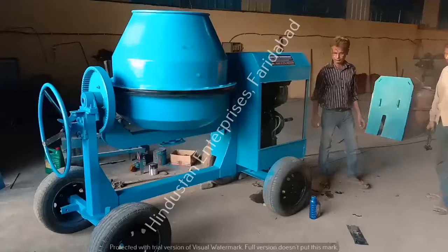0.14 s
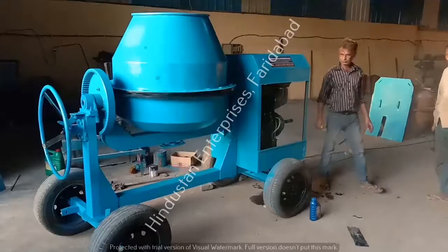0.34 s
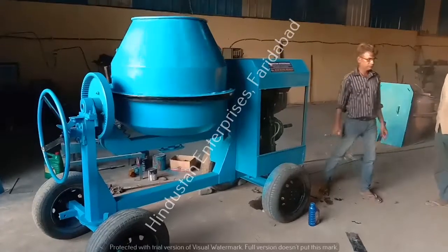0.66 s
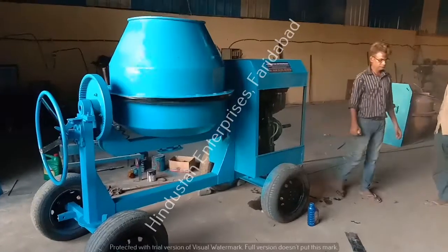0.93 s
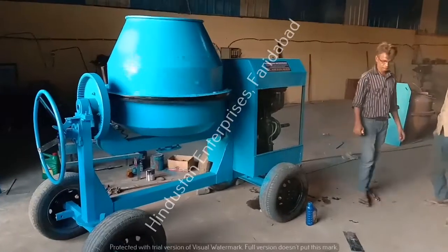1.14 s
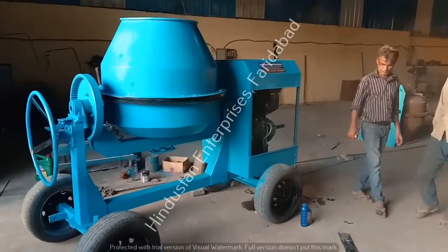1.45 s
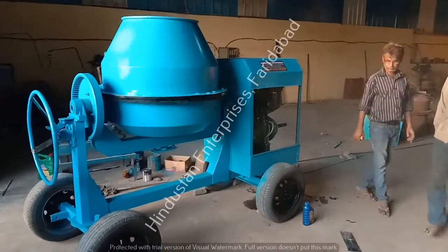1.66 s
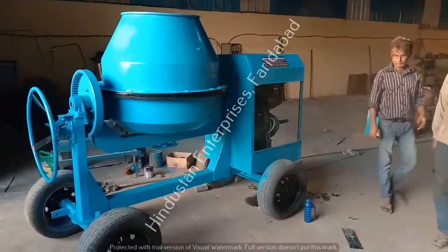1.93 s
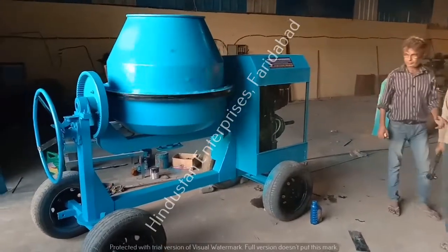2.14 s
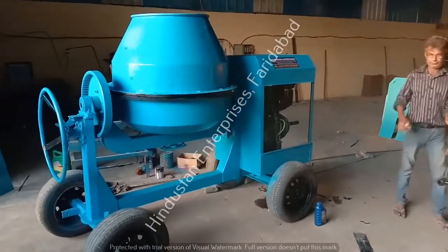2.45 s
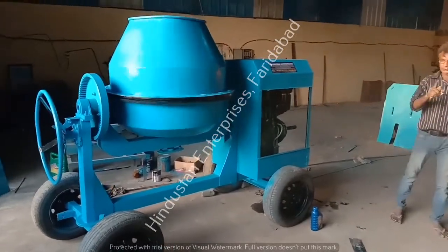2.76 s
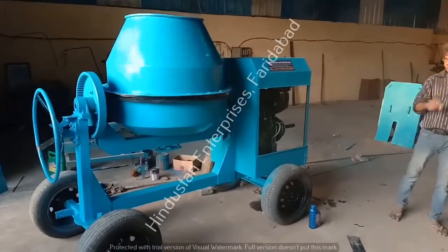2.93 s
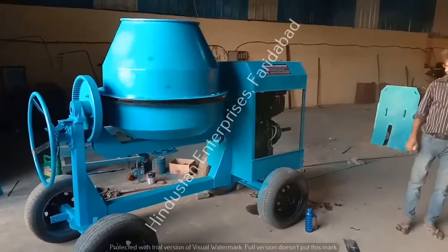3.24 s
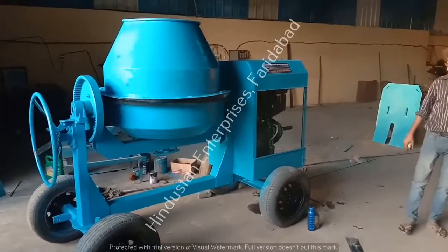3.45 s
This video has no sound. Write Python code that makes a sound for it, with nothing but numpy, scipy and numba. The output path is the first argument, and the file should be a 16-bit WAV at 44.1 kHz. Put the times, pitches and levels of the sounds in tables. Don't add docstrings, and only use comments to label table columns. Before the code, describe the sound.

Concrete mixer roar with fast diesel thumping, grinding gears and metallic drum rattle in a large shed.

```python
import sys
import numpy as np
from scipy import signal
from scipy.io import wavfile
from scipy.ndimage import uniform_filter1d
from numba import njit

SR = 44100
rng = np.random.default_rng(int(sys.argv[2]) if len(sys.argv) > 2 else 0)


def dump(signal):
    limited = np.clip(np.atleast_2d(signal).T, -1, 1)
    pcm = np.round(limited * 32767).astype(np.int16)
    wavfile.write(sys.argv[1], SR, pcm)


def gain_from_db(level_db):
    decades = np.asarray(level_db, float) / 20
    return 10 ** decades


N = 158319
START_S = 0.14


def level(x, db):
    return x * gain_from_db(db) / np.sqrt(np.mean(x ** 2))


def track(points):
    at_s, value = np.array(points).T
    return np.interp(np.arange(N) / SR, at_s, value)


@njit
def svf(x, hz, width):
    y = np.empty(len(x))
    band, low = 0., 0.
    g, k = np.tan(np.pi * hz / SR), width / hz
    for i in range(len(x)):
        v = (band + g * (x[i] - low)) / (1 + g * (g + k))
        band = 2 * v - band
        low += 2 * g * v
        y[i] = k * v
    return y


def svf_twice(x, hz, width):
    return svf(svf(x, hz, width), hz, width)


@njit
def walls(x, lags, gain, damp):
    line, soft, out = np.zeros((8, 8192)), np.zeros(8), np.zeros(len(x))
    for i in range(len(x)):
        total = 0.
        for k in range(8):
            soft[k] += (1 - damp) * (gain[k] * line[k, (i - lags[k]) & 8191] - soft[k])
            total += soft[k]
        out[i] = soft[0] - soft[3] + soft[4] - soft[7]
        for k in range(8):
            line[k, i & 8191] = x[i] + soft[k] - total / 4
    return out


def walk(rate_hz):
    hold = int(SR / rate_hz)
    steps = np.repeat(rng.standard_normal(N // hold + 1), hold)
    return 1.57 * uniform_filter1d(uniform_filter1d(steps, hold), hold)[:N]


def ring(x, body, wander_db, rate_hz, stagger_s=0.):
    out = np.zeros(N)
    for k, (hz, width_hz, db) in enumerate(body):
        late = np.roll(x, int(k * stagger_s * SR))
        mode = level(svf(late, 1. * hz, 1. * width_hz), db)
        out += (-1) ** k * mode * gain_from_db(wander_db * walk(rate_hz))
    return out


def cycles():
    # t/s, rate/(cycles/s), two crank turns a cycle
    speed = [
        (0, 13.1),
        (.75, 13.07),
        (1.0, 12.91),
        (1.5, 12.82),
        (2.0, 12.89),
        (2.5, 12.99),
        (3.0, 13.02),
        (3.6, 13.04),
    ]
    fires_at_s = 2.117
    count = np.cumsum(track(speed)) / SR
    return count - np.interp(fires_at_s, np.arange(N) / SR, count)


def crank(second_db, scatter_db, jitter_s, late_s=0.):
    turns = 2 * cycles()
    k = np.arange(np.ceil(turns[0]), turns[-1])
    chance = rng.standard_normal((2, len(k)))
    at_s = np.interp(k, turns, np.arange(N) / SR) + late_s + jitter_s * chance[0]
    out = np.zeros(N)
    out[np.clip((at_s * SR).astype(int), 0, N - 1)] = gain_from_db(second_db * (k % 2) + scatter_db * chance[1])
    return out


def burst(pulses, decay_s, rise_s):
    for s in (decay_s, rise_s):
        pulses = signal.lfilter([1], [1, -np.exp(-1 / (s * SR))], pulses)
    return level(pulses, 0)


def facing():
    return gain_from_db(track([(0, -4), (1.3, 0)]))


def rattle():
    contacts_per_s, spread_db = 2500, -1
    hit = rng.random(N) < contacts_per_s / SR
    return hit * gain_from_db(spread_db * rng.exponential(size=N)) * rng.standard_normal(N)


def shed(struck):
    t60_s, damp, shed_db = .9, .45, -9
    lags = np.array([811, 1033, 1307, 1601, 1879, 2203, 2521, 2843])
    return walls(struck, lags, gain_from_db(-60 * lags / SR / t60_s), damp) * gain_from_db(shed_db) / 2


def roar():
    # f/Hz, level/dB
    roar_curve = [(70, -24), (110, -11), (180, -8),
                  (450, -2), (1400, 0), (4200, -11.5), (5600, -19.5), (9800, -23), (14500, -76)]
    swell_db, flicker_db, roar_db = .3, .7, -18
    swell = swell_db * walk(1.83)
    source = level(rattle(), -19.0) + level(rng.standard_normal(N), -2.3)
    f_hz, curve_db = np.array(roar_curve).T
    out = np.zeros(N)
    for hz in 70 * 2 ** np.arange(0, 7.8, 1 / 4):
        band = svf_twice(source, hz, hz / 2.5)
        gain_db = np.interp(np.log(hz), np.log(f_hz), curve_db)
        out += gain_from_db(gain_db + swell + flicker_db * walk(9)) * band
    return level(out, roar_db)


def hum():
    orders = (12, 16, 18, 28, 36)
    # t/s, then level/dB of each order
    order_levels = [(.2, -53, -34, -37, -45, -50), (.45, -44, -23, -34, -44, -44),
                    (.7, -42, -33, -39, -45, -34), (.95, -38, -47, -25, -34, -45),
                    (1.2, -44, -24, -30.5, -46, -50), (1.45, -35, -27, -30, -39, -46),
                    (1.7, -34, -37, -39, -38, -42), (1.95, -33, -27.5, -41, -37, -43),
                    (2.2, -30, -26, -32, -44, -55), (2.45, -37, -37, -26, -28, -36),
                    (2.7, -40, -46, -23, -31, -39), (2.95, -42, -30, -31, -32, -30),
                    (3.2, -39, -33, -33, -28, -30), (3.45, -33, -37, -32, -23, -39.5)]
    flutter_db = .8
    t = np.arange(N) / SR
    at_s, *rows = np.array(order_levels).T
    phase = 2 * np.pi * cycles()
    out = np.zeros(N)
    for k, db in zip(orders, rows):
        gain = gain_from_db(np.interp(t, at_s, db) + flutter_db * walk(8.88))
        out += np.sqrt(2) * gain * np.cos(k * phase)
    return out


def steel():
    # f/Hz, width/Hz, level/dB
    frame_modes = [(636, 170, -3.5), (1105, 140, -2), (1263, 49, -3), (1555, 330, -1), (1775, 88, 0.5),
                   (2120, 176, -4.5), (2330, 154, -0.5), (2487, 107, 0.5), (2760, 220, -3),
                   (3080, 156, 2.5), (3594, 370, 4), (4320, 520, 1)]
    # f/Hz, width/Hz, level/dB
    panel_modes = [(798, 20, -4), (847, 20, -3), (888, 20, -5), (1540, 26, 2), (3263, 40, -4)]
    # t/s, level/dB
    panel_turn = [
        (.15, -5),
        (.4, 0),
        (1.0, 1),
        (1.7, 0),
        (2.0, -3),
        (2.8, -2),
        (3.1, 3),
        (3.59, 3),
    ]
    frame = level(ring(rattle(), frame_modes, .8, 4.45), -17.5)
    panels = level(ring(rattle(), panel_modes, 1.2, 4.26), -25)
    opening = gain_from_db(track([(START_S, -2), (0.37, 0)]))
    return (frame + panels * gain_from_db(track(panel_turn))) * opening


def valves():
    hz, width_hz, tick_db = 10000., 11000., -37.5
    pulses = crank(second_db=-2.5, scatter_db=1., jitter_s=.001)
    env = burst(pulses, decay_s=.006, rise_s=.0015) * facing()
    return level(svf_twice(env * rng.standard_normal(N), hz, width_hz), tick_db)


def injector():
    hz, width_hz, snap_db = 13500., 5000., -45.5
    pulses = crank(second_db=-5, scatter_db=1., jitter_s=.0008)
    env = burst(pulses, decay_s=.0045, rise_s=.001) * facing()
    return level(svf_twice(env * rng.standard_normal(N), hz, width_hz), snap_db)


def exhaust():
    # f/Hz, width/Hz, level/dB; narrow modes boom as an engine order drifts onto them
    pipe_modes = [(99, 13.3, 0), (132.4, 5.8, -4.5), (65, 10, -23)]
    # f/Hz, width/Hz, level/dB
    drum_modes = [(147, 21, -9), (182.5, 19, -4), (197.5, 7.3, -9), (226, 20, -4.5), (244.6, 6.3, -1.5)]
    # f/Hz, width/Hz, level/dB
    box_modes = [(281.8, 35, -2.5), (309.5, 5.5, -5.5), (344, 10, -3.5), (371, 7.5, -1), (398, 14.6, -3),
                 (470.4, 27, -3.5)]
    # t/s, level/dB
    thump_drift = [
        (.2, -5),
        (.5, 2),
        (.72, -9),
        (.95, -0.5),
        (1.4, -1),
        (2.3, 0.5),
        (3.0, 0.5),
        (3.59, 0),
    ]
    # t/s, level/dB
    boom_drift = [(.3, 4), (.52, 6.5), (0.749, 1), (1.05, 4.5), (1.348, 4.5), (1.65, -0.5), (2.1, 3.5),
                  (2.42, 9.5), (2.75, -1), (3.1, 2), (3.59, 0.5)]
    scatter_db, jitter_s, late_s, stagger_s = 1.5, .0002, -.0075, .011
    grind_db, drum_db, exhaust_db = .5, 0.5, -31
    pulses = crank(-9.5, scatter_db, jitter_s, late_s)
    shaken = level(crank(-8, scatter_db, jitter_s, late_s), 0) + gain_from_db(grind_db) * rng.standard_normal(N)
    thump = ring(pulses, pipe_modes, 1.5, 2.34) * gain_from_db(track(thump_drift))
    boom = ring(shaken, drum_modes, 1.2, 4.62, stagger_s) * gain_from_db(drum_db + track(boom_drift))
    box = ring(shaken, box_modes, 1.2, 4.82, stagger_s)
    return gain_from_db(exhaust_db) * (thump + boom + box)


def scene():
    struck = steel() + valves() + exhaust()
    return (struck + shed(struck) + roar() + hum() + injector())[None]


def band_limit(x):
    return signal.sosfilt(signal.butter(12, 15380, fs=SR, output="sos"), x)


def record(dry):
    low_cut_hz, top_hz, clip, hiss_db = 66, 12500, 1.25, -53
    open_s, fade_s, fade_power = .008, 0.28, 1.18
    x = signal.sosfilt(signal.butter(8, low_cut_hz, "high", fs=SR, output="sos"), dry)
    x = np.tanh(clip * x) / clip
    x = signal.sosfilt(signal.butter(3, top_hz, fs=SR, output="sos"), x)
    x = x + gain_from_db(hiss_db) * np.diff(rng.standard_normal(N + 1))
    since_s = np.arange(N) / SR - START_S
    gate = np.clip(since_s / open_s, 0, 1)
    fade = 0.09 + 0.85 * np.clip(since_s / fade_s, 0, 1) ** fade_power
    return band_limit(x * gate * fade)


dry = scene()
out = record(dry)
dump(out)
```